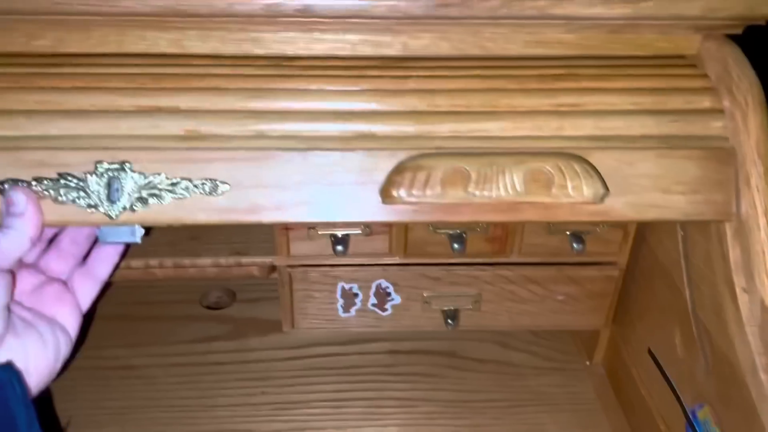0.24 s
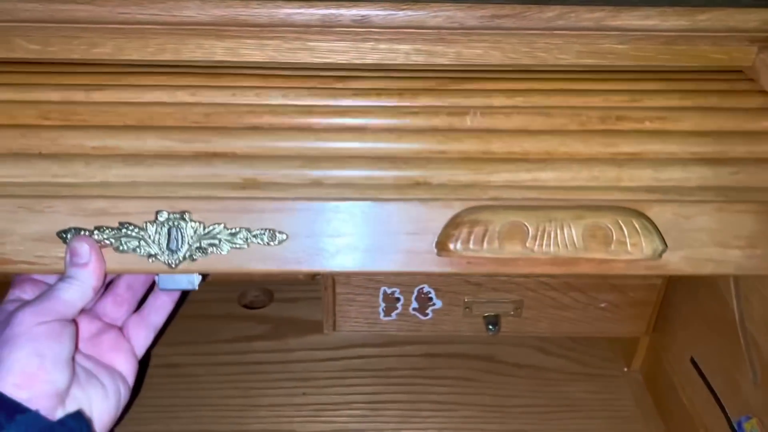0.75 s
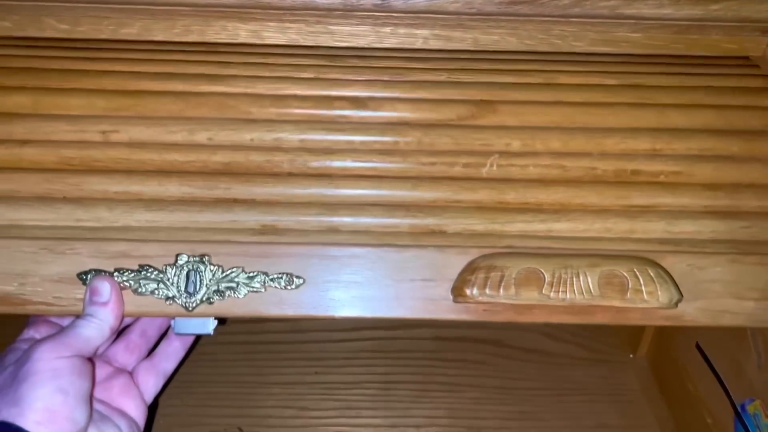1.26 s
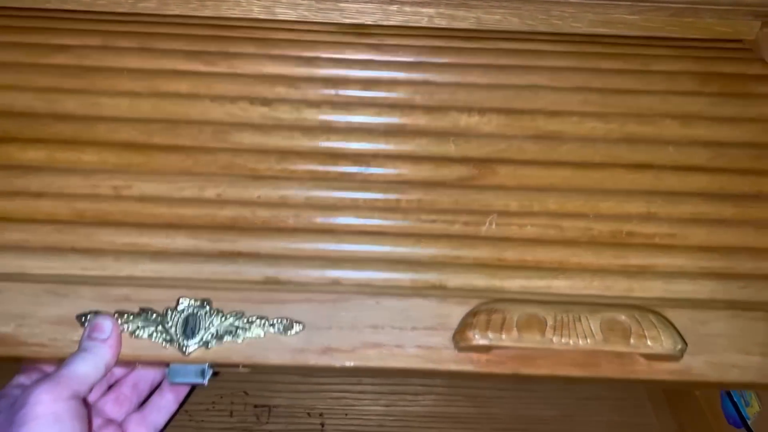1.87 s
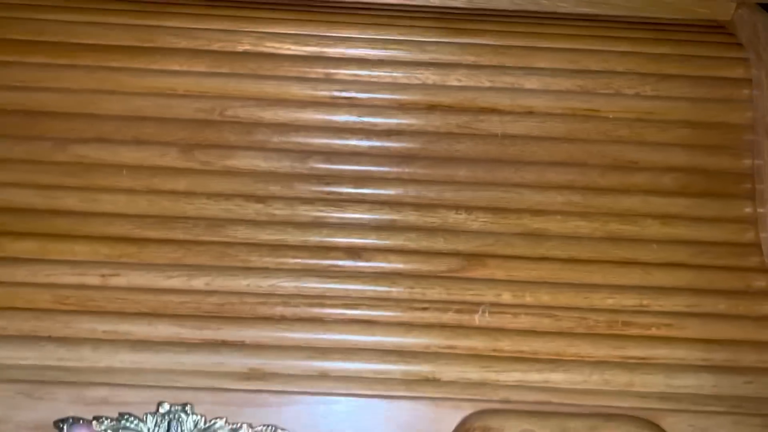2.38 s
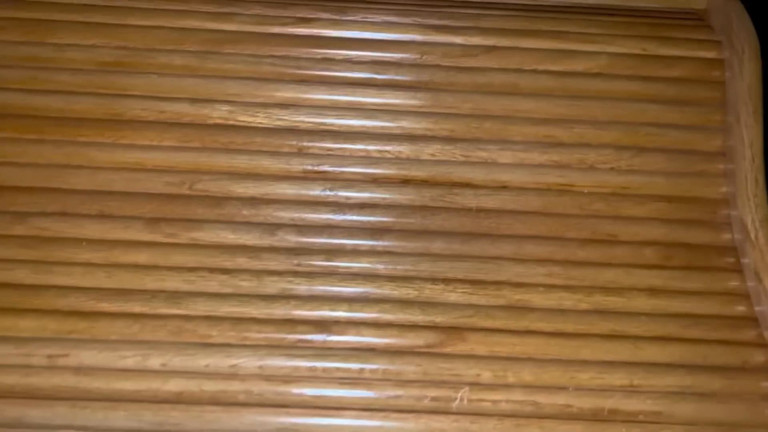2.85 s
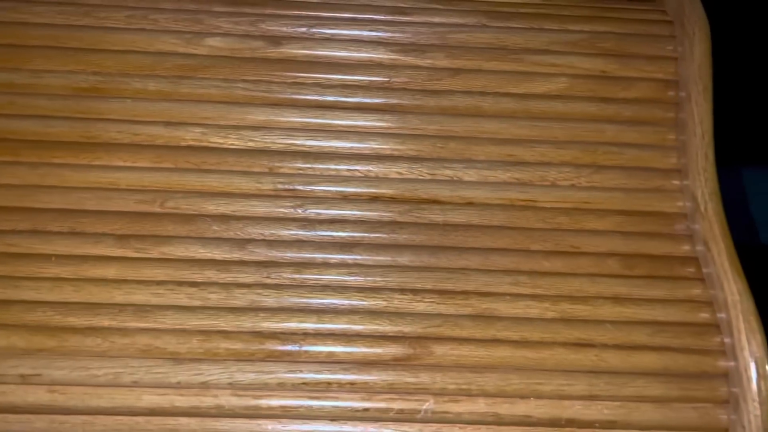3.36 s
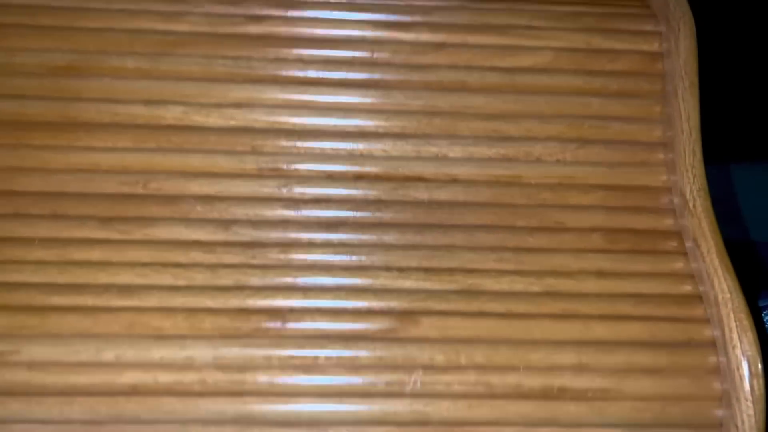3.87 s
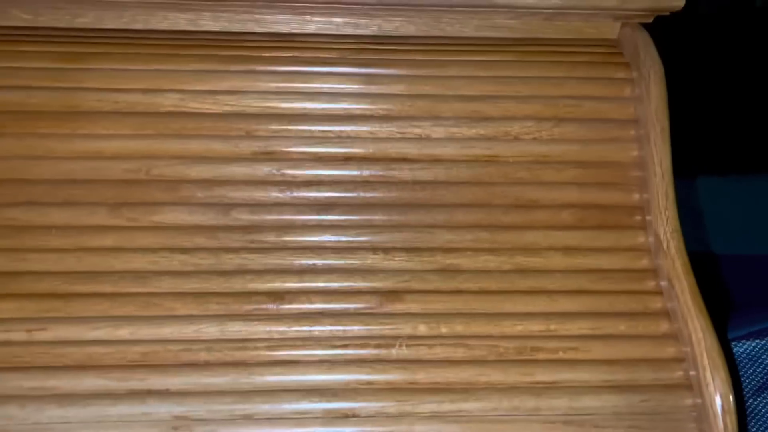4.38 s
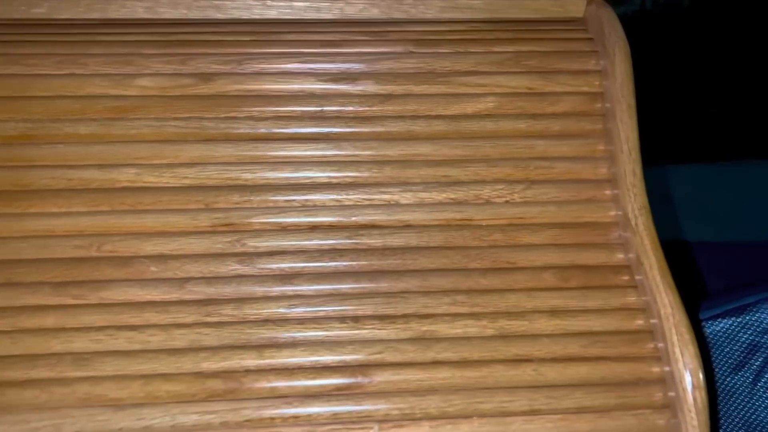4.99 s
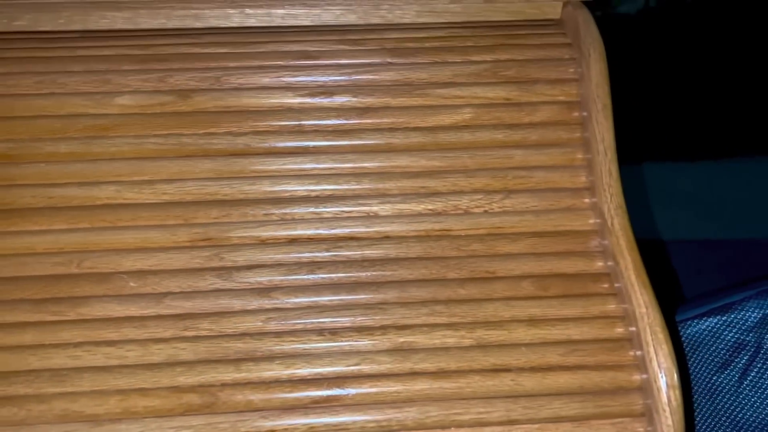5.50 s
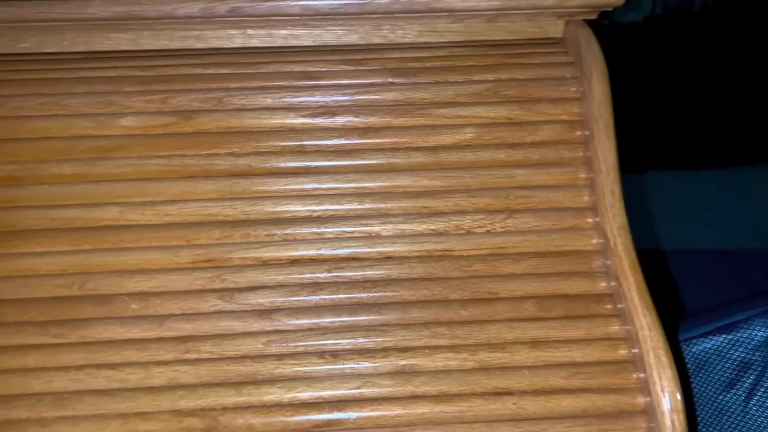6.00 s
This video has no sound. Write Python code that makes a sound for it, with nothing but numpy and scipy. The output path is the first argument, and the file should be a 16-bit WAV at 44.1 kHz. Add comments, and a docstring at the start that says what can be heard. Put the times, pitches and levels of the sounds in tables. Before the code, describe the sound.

A wooden slatted roll top is pulled down, heard close in a small room with a short tail and a faint low hush. It starts at once with a rumbling, rattling push and a clack at 0.1 seconds, then eases, with soft thumps and a slight creak around 0.3 to 0.4. From 0.7 the slide builds in uneven surges, strongest from about 1.0 to 2.7: slat ends scrape dryly over a low, sagging judder, with clacks near 1.05, 1.4, 1.6, 2.2 and 2.45. At 3.05 a hard, bright knock bursts out with a hollow thump, the loudest moment. A quiet gap follows, then another booming slide at 3.8 to 4.1 with low bumps and ticks. Weaker shuffles come at 4.5 to 4.8, small clacks at 5.1, and a softer settling bump with crisp clacks at 5.35. Very faint creaks and a light brush finish near 6.

```python
"""In a small room, close to the microphone, a wooden desk's slatted roll top is pulled down in uneven pushes.
Slat ends scrape and rattle as coloured friction noise while a gliding judder note and low noise boom.
Clacks, ticks and one sharp knock are noise bursts ringing the slats; thumps ring the hollow desk.
After the knock the curtain slides on, settles with a softer bump and creaks faintly over a steady hush."""
import sys
import numpy as np
from scipy import signal
from scipy.fft import rfft, irfft, next_fast_len
from scipy.io import wavfile
from scipy.ndimage import uniform_filter1d, map_coordinates

SR = 44100
rng = np.random.default_rng(int(sys.argv[2]) if len(sys.argv) > 2 else 0)


def wav_out(sig):
    """Save sig, one row per channel (or a flat mono array), as 16-bit PCM at SR to the path in sys.argv[1]."""
    wavfile.write(sys.argv[1], SR, np.round(np.clip(np.atleast_2d(sig).T, -1, 1) * 32767).astype(np.int16))


N = 275239
TIME = np.arange(N) / SR
RING_TIME = TIME[:SR // 2]


def amp(db):
    """Decibels to amplitude."""
    return 10 ** (np.asarray(db) / 20)


def unit(x):
    """Scaled to rms 1."""
    return x / np.sqrt(np.mean(x ** 2) + 1e-20)


def along(points, hz):
    """Read a curve of (frequency, value) points on a log frequency axis."""
    point_hz, values = np.transpose(points)
    return np.interp(np.log(hz + 1), np.log(point_hz + 1), values)


def curves(rows):
    """One value per sample for each column after the time."""
    s, *columns = np.transpose(rows)
    return [np.interp(TIME, s, column) for column in columns]


def wobble(knots_per_s):
    """A smooth random curve through evenly spaced random knots."""
    return map_coordinates(rng.standard_normal(4096), [TIME * knots_per_s], mode="wrap")


def filtered(x, response):
    """x times a response of frequency."""
    n = x.shape[-1]
    padded = next_fast_len(n + 8192)
    spectrum = rfft(x, padded) * response(np.fft.rfftfreq(padded, 1 / SR))
    return irfft(spectrum, padded)[..., :n]


def causal(x, gain_db, size=2048):
    """x through a minimum-phase filter with the given dB curve."""
    log_gain = gain_db(np.fft.rfftfreq(size, 1 / SR)) * np.log(10) / 20
    cepstrum = irfft(log_gain)
    # folding the cepstrum forward leaves nothing sounding before the onset
    cepstrum[1:size // 2] *= 2
    cepstrum[size // 2 + 1:] = 0
    impulse = irfft(np.exp(rfft(cepstrum)))
    return signal.fftconvolve(x, impulse[None], axes=1)[:, :x.shape[1]]


def add(track, s, sound):
    """Mix a sound in at time s."""
    part = track[:, round(s * SR):][:, :sound.shape[-1]]
    part += sound[..., :part.shape[1]]


# likeness of left and right: pitch_hz, correlation (1 = identical)
LIKENESS = [(100, 0.98), (300, 0.94), (640, 0.69), (1000, 0.41), (1700, 0.21), (2500, 0.52), (3600, 0.15),
            (5500, .2), (7200, 0.55), (9000, 0.067), (13000, 0.31)]


def stereo(pair, gain):
    """Two unrelated signals, coloured and blended into left and right, rms 1."""
    def mid_side_gain(hz):
        turn = np.arccos(np.clip(along(LIKENESS, hz), -1, 1)) / 2
        return gain(hz) * np.array([np.cos(turn), np.sin(turn)])

    mid, side = filtered(pair, mid_side_gain)
    return unit(np.array([mid + side, mid - side]))


def tail(decays):
    """A stereo noise tail, left energy 1, in which each frequency dies at its own speed."""
    noise = stereo(rng.standard_normal((2, SR // 2)), np.ones_like)
    hz, t, z = signal.stft(noise, SR, nperseg=128)
    fade = amp(-60 * t / along(decays, hz)[:, None])
    x = signal.istft(z * fade, SR, nperseg=128)[1][:, :SR // 2]
    return x / np.linalg.norm(x[0])


# hand pushes: start_s (full speed), rise_s, hold_s, release_s, scrape_db, rattle_db, boom_db,
# note_hz (judder, before it sags); levels are before the layer trims in slide()
HAND_PUSHES = [(0.029, 0.13, .025, 0.18, -49.5, -41.5, -27.5, 135),
               (0.104, 0.087, .015, 0.14, -51.5, -41.5, -29, 157.9),
               (0.338, 0.22, .06, 0.11, -59, -51, -38, 172),
               (0.675, 0.21, .04, 0.1, -53.5, -49.5, -34.5, 148),
               (0.753, 0.24, 0.056, 0.35, -53, -45.5, -40.5, 150),
               (1.03, .12, .025, 0.087, -51, -40, -23.5, 154.8),
               (1.244, 0.16, 0.094, 0.14, -51, -41.5, -30.5, 150.9),
               (1.54, .19, .11, 0.29, -53.5, -45.5, -34, 150),
               (1.796, 0.098, 0.087, 0.18, -48, -38.5, -25, 150),
               (1.93, 0.077, 0.017, 0.32, -51.5, -39, -23, 133.8),
               (2.106, 0.24, 0.086, .09, -47, -39.5, -26.5, 139.6),
               (2.186, .05, 0.013, .14, -49, -39, -23.5, 133.7),
               (2.424, .12, 0.018, 0.13, -53.5, -45, -30.5, 155.3),
               (2.511, .12, .06, 0.13, -52.5, -46, -37, 148), (2.627, .12, 0.036, .16, -49, -40, -28, 139),
               (2.965, .27, 0.1, 0.11, -50, -42, -31.5, 148),
               (3.494, 0.97, .12, .30, -68, -61, -59.5, 139.9),
               (3.799, .14, .07, .15, -50, -42.5, -31, 140), (3.88, 0.082, .07, 0.26, -49, -37, -24, 114.8),
               (4.057, 0.082, 0.027, 0.22, -57.5, -52, -29, 142),
               (4.488, 0.14, 0.077, .15, -55.5, -49.5, -34, 138),
               (4.60, .10, .08, 0.15, -52.5, -44.5, -34.5, 142),
               (4.83, .25, .27, 0.79, -65, -60, -49, 155.5),
               (5.498, 0.07, .15, .40, -106.5, -66.5, -53.5, 140.8),
               (6.212, 0.49, .04, 0.18, -59, -53, -56, 140)]


def pushes():
    """Levels of boom, rattle and scrape (dB) and the judder note (Hz): each push rises, holds and dies away."""
    columns = np.transpose(HAND_PUSHES)[:, :, None]
    start, rise, hold, release, scrape_db, rattle_db, boom_db, note_hz = columns
    edge_db = 20  # scrape growth over the rise, and its fall over the release
    # the heavy curtain starts and stops booming a little after the slats move, and swells and fades faster;
    # the rattle falls between the scrape and the boom
    boom_lag_s, boom_steepness = .033, 1.288
    rattle_lag_s, rattle_steepness = 0.0086, 1.076
    sag_hz_per_s, sag_s = 90, .2  # the note sinks as a push spends itself, for at most this long

    def fade_db(t):
        before, after = (start - t) / rise, (t - start - hold) / release
        return edge_db * np.clip(np.maximum(before, after), 0, 10)

    t = TIME[::64]
    scrapes = amp(scrape_db - fade_db(t)) ** 2
    rattles = amp(rattle_db - rattle_steepness * fade_db(t - rattle_lag_s)) ** 2
    booms = amp(boom_db - boom_steepness * fade_db(t - boom_lag_s)) ** 2
    levels = [10 * np.log10(power.sum(axis=0)) for power in (booms, rattles, scrapes)]
    # pushes share the note by boom power, so the strongest leads
    notes = note_hz - sag_hz_per_s * np.clip(t - start, 0, sag_s)
    note = np.sum(booms * notes, axis=0) / booms.sum(axis=0)
    return curves(np.transpose([t, *levels, note]))


def grains(hits_per_s, spread_db, smooth):
    """Tiny contacts of scattered size on a bed of smooth friction."""
    struck = rng.random((2, N)) < hits_per_s / SR
    sizes = rng.standard_normal((2, N)) * amp(spread_db * rng.standard_normal((2, N)))
    return unit(struck * sizes) + smooth * rng.standard_normal((2, N))


def patchy(pair, depth_db):
    """The resonances shift as each slat passes a new spot of the groove."""
    z = signal.stft(pair, nperseg=1024)[2]
    field = uniform_filter1d(rng.standard_normal(z.shape[1:]), size=4, axis=0)  # across frequency
    field = uniform_filter1d(field, size=10, axis=1)  # across time
    return signal.istft(z * amp(depth_db * unit(field)), nperseg=1024)[1][:, :N]


# ring of the slats, rubbed or struck: pitch_hz, level_db (relative, used only when struck)
SLAT_MODES = [(335, -4), (813, 0), (1394, -2), (1550, -6), (2187, 0), (2377, -3), (2562, 0), (2886, -5),
              (3223, -9), (3553, -8), (3801, -8), (3976, -5), (4760, -6), (5263, -4), (5810, -5),
              (6122, -3), (6336, -4), (6606, -6)]


def rubbed(spectrum, lift_db, width_hz):
    """Gain of rubbed wood: a broad spectrum, lifted at each slat mode."""
    def gain(hz):
        peaks = [1 / (1 + ((hz - mode_hz) / width_hz) ** 2) for mode_hz, _ in SLAT_MODES]
        return amp(along(spectrum, hz) + lift_db * np.max(peaks, axis=0))

    return gain


# colours of the slide, each: pitch_hz, level_db (per Hz, relative)
# low boom of the curtain over the desk
BOOM_COLOUR = [(30, -30), (55, -16), (105, 1.5), (135, -1), (170, 2), (210, -9.5), (260, -20), (330, -24.5),
               (700, -65)]
# deep rocking of the carcass
SWAY_COLOUR = [(20, -23.5), (45, -7.5), (85, -2), (125, -15), (300, -55.5)]
# loose slats rattling
RATTLE_COLOUR = [(120, -35.5), (200, -4), (254, 0), (291, -9), (336, -3), (641, -12), (789, -12),
                 (932, -15), (1220, -16), (1370, -24), (2400, -37), (3120, -42), (5280, -120)]
# slat ends scraping in the grooves
SCRAPE_COLOUR = [(820, -30), (1400, -6.5), (2010, -4), (2290, -4.5), (3390, -8), (3750, -8), (4360, -7),
                 (7510, -10.5), (8820, -13), (9190, -19.5), (10100, -40.5), (10800, -19), (11500, -14),
                 (14000, -18), (15500, -20.5)]


def slide():
    """Slat ends chatter along the grooves by stick-slip and set the curtain booming."""
    boom_db, rattle_db, scrape_db, note_hz = pushes()
    phase = 2 * np.pi * np.cumsum(note_hz * np.exp(.06 * wobble(55))) / SR
    octave = amp(-23.5 + 6 * wobble(20)) * np.sin(2 * phase)
    judder = unit((np.sin(phase) + octave) * amp(3.9 * wobble(35)))
    rumble = stereo(rng.standard_normal((2, N)), lambda hz: amp(along(BOOM_COLOUR, hz)))
    # the harder the push, the more the stick-slip locks on to one note; a very light one does not start it
    locked = .75 / (1 + np.exp(-(boom_db + 35) / 4))
    started = 1 / (1 + np.exp(-(boom_db + 60) / 3))
    blend = np.sqrt(locked) * judder + np.sqrt(1 - locked) * rumble
    boom = started * amp(boom_db + 0.43) * blend

    # even a light touch rocks the carcass, deep below the judder
    rocking = stereo(rng.standard_normal((2, N)), lambda hz: amp(along(SWAY_COLOUR, hz)))
    sway = amp(-45.5 + 0.23 * (boom_db + 35.0)) * rocking

    # friction swells with every judder and with the uneven grain of the wood
    grip = unit(amp(1.23 * wobble(70) + 0.37 * locked * np.sin(phase)))
    rattle_grains = patchy(grains(hits_per_s=900, spread_db=1.5, smooth=1.0), depth_db=3.0)
    rattle = stereo(rattle_grains, rubbed(RATTLE_COLOUR, lift_db=3.5, width_hz=10.0))
    scrape_grains = patchy(grains(hits_per_s=1700, spread_db=3.0, smooth=1.727), depth_db=3.0)
    scrape = stereo(scrape_grains, rubbed(SCRAPE_COLOUR, lift_db=3.5, width_hz=44))
    friction = grip * amp(rattle_db + 3.0) * rattle + grip ** 0.25 * amp(scrape_db + 2.5) * scrape
    return boom + sway + friction


def hardened(spectrum, treble_db):
    """A dB curve whose treble rises with the hardness of the contact."""
    return lambda hz: along(spectrum, hz) + treble_db * hz ** 4 / (hz ** 4 + 3500 ** 4)


# decay of the struck wood: pitch_hz, t60_s
WOOD_DECAY = [(300, .16), (1000, .12), (3000, .085), (6000, .07), (12000, .03)]


def blow(colour_db, contact_s, ring_db, wood_db, lag_s):
    """One contact: snap, brief crunch, slat modes and dense wood ring; its loudest millisecond has rms 1."""
    t = RING_TIME
    hz, db = np.transpose(SLAT_MODES)[:, :, None]
    strength = amp(db + 2 * rng.standard_normal(hz.shape)) * rng.choice([-1, 1], hz.shape)
    decay = amp(-60 * t / along(WOOD_DECAY, hz))
    ring = np.sum(strength * decay * np.sin(2 * np.pi * hz * t), axis=0)
    crunch = rng.standard_normal(len(t)) * np.exp(-t / contact_s)
    snap = .5 * (t == 0)
    direct = snap + crunch / np.linalg.norm(crunch) + amp(ring_db) * ring / np.linalg.norm(ring)
    # the sound reaches the two microphone ports at different moments
    port_lags_s = np.array([[0], [lag_s]])
    pair = filtered(direct, lambda f: np.exp(-2j * np.pi * f * port_lags_s))
    x = causal(pair + amp(wood_db) * tail(WOOD_DECAY), colour_db)
    power = uniform_filter1d(np.mean(x ** 2, axis=0), size=44, mode="constant")  # 1 ms average
    return x / np.sqrt(power.max())


# slats clacking in the grooves: start_s, level_db (before trim), treble_db
SLAT_CLACKS = [(0.1215, -26, -8), (0.611, -34.5, -19), (1.051, -34, -49), (1.414, -33, -12),
               (1.581, -35, -17), (2.168, -25, -15), (2.223, -28, -2), (2.454, -26.5, -14), (2.797, -38, 2),
               (3.778, -35, -4), (4.563, -35, -23), (4.570, -29.5, -35), (5.132, -39.5, 9),
               (5.137, -38.5, -27), (5.3424, -38, -5), (5.3452, -30.5, 2.5), (5.351, -35, -1)]
# small hard ticks of the slat edges: start_s, level_db, pitch_hz
EDGE_TICKS = [(2.198, -38, 5468), (2.785, -37, 12300), (2.797, -36, 4560), (2.968, -43, 6050),
              (3.9511, -39, 4500), (4.045, -43, 4340), (4.313, -58, 4209), (4.709, -46, 4610)]
# colour of a slat dropping against the groove wall: pitch_hz, level_db (relative)
CLACK_COLOUR = [(30, -22), (150, -1.5), (350, 4.5), (900, -1.5), (1600, -7), (2500, -3), (3800, -12.5),
                (6000, -13), (14000, -21)]


def clacks():
    """Loose slats drop against the groove walls; their edges tick."""
    out = np.zeros((2, N))
    for s, db, treble_db in SLAT_CLACKS:
        colour_db = hardened(CLACK_COLOUR, treble_db)
        clack = blow(colour_db, contact_s=0.0017, ring_db=-16, wood_db=-3.5, lag_s=.00005)
        add(out, s, amp(db - 2.5) * clack)
    for s, db, pitch_hz in EDGE_TICKS:
        edge_db = lambda hz: -10 * np.log10(1 + ((hz - pitch_hz) / 1300) ** 2)
        tick = blow(edge_db, contact_s=0.0011, ring_db=-3.5, wood_db=-5.5, lag_s=.00002)
        add(out, s, amp(db) * tick)
    return out


# contacts of the sharp knock: start_s, level_db (before trim), treble_db
KNOCK_CONTACTS = [(3.0552, -20, -5), (3.0568, -10.5, -2), (3.0604, -7, 5), (3.0616, -15, -1),
                  (3.0725, -24, -6), (3.086, -26, -6)]
# colour of the hard catch: pitch_hz, level_db (relative)
CRACK_COLOUR = [(30, -30), (150, -4), (260, 2), (450, -1), (900, -1), (1500, -1), (2400, 0), (3300, -4),
                (4400, -3.5), (5400, 0), (6300, 5), (7500, -6), (13000, -17), (16000, -32)]


def knock():
    """The curtain catches hard on one side, in a quick burst of contacts."""
    out = np.zeros((2, N))
    for s, db, treble_db in KNOCK_CONTACTS:
        colour_db = hardened(CRACK_COLOUR, treble_db)
        contact = blow(colour_db, contact_s=.0009, ring_db=-11, wood_db=-8, lag_s=.00034)
        add(out, s, amp(db - 3.5) * contact)
    return out


# weight of the curtain landing on the desk: start_s, level_db (before trim)
LANDINGS = [(.29, -32), (.435, -35), (1.052, -29), (2.228, -26), (3.053, -17), (3.083, -22), (3.879, -24),
            (3.965, -24), (5.133, -32), (5.344, -27), (5.364, -28), (5.405, -34)]
# ring of the hollow desk: pitch_hz, level_db (relative), t60_s
DESK_MODES = [(48.94, -3.5, 0.31), (65, 4, 0.29), (99.7, -3, 0.37), (125.4, 3, 0.41), (165, -5.5, 0.18),
              (238.2, 2.5, 0.0797), (242.6, 4, 0.035), (327.6, -8.5, 0.069), (474, -12, 0.17)]


def thumps():
    """The desk carcass rings low, as decaying modes, under the weight of the curtain."""
    out, t = np.zeros((2, N)), RING_TIME
    hz, db, t60 = np.transpose(DESK_MODES)[:, :, None]
    soft_onset = 1 - np.exp(-t / 0.006)
    for s, level_db in LANDINGS:
        strength = amp(db + 0.37 * rng.standard_normal(hz.shape) - 60 * t / t60)
        modes = strength * np.sin(2 * np.pi * (hz * t + rng.random(hz.shape)))
        add(out, s, amp(level_db - 7.5) * modes.sum(axis=0) * soft_onset)
    return out


# creaks of the wood: start_s, pitch_hz (midway), level_db
WOOD_CREAKS = [(0.3, 246, -42), (5.66, 574, -67.5), (5.83, 669, -69), (6.03, 571, -62)]


def creaks():
    """Brief, slightly rising squeaks of wood on wood."""
    out, t = np.zeros((2, N)), TIME[:SR // 10]
    for s, hz, db in WOOD_CREAKS:
        pitch = hz * (1 + 0.87 * (t - t.mean()) + 0.011 * wobble(140)[:len(t)])
        squeak = np.hanning(len(t)) * np.sin(2 * np.pi * np.cumsum(pitch) / SR)
        add(out, s, amp(db) * unit(squeak))
    return out


# decay of the small room: pitch_hz, t60_s
ROOM_DECAY = [(120, 0.233), (500, 0.22), (3000, 0.19), (12000, 0.21)]


def room(desk):
    """The room answers the desk with a short diffuse tail."""
    return amp(-19) * signal.fftconvolve(desk, tail(ROOM_DECAY), axes=1)[:, :N]


# colour of the background hush: pitch_hz, level_db (per Hz, relative)
HUSH_COLOUR = [(15, -34), (25, -9), (64, 3), (144, -12.5), (221, -3.5), (281, -15.5), (331, -8), (722, -31),
               (1240, -22), (3440, -40.5), (6730, -41), (8810, -58), (10100, -66.5), (12200, -47.5),
               (15500, -52)]


def hush():
    """Steady coloured noise behind everything."""
    return amp(-53.5) * stereo(rng.standard_normal((2, N)), lambda hz: amp(along(HUSH_COLOUR, hz)))


def scene():
    """The desk, the answer of the room and its steady hush."""
    desk = slide() + clacks() + knock() + thumps() + creaks()
    balance = amp([[.25], [-.25]])  # left a touch louder
    return (desk + room(desk)) * balance + hush()


def record(dry):
    """The microphone sheds the deepest bass, has a notch in the treble and rounds off the highest peaks."""
    notch_hz, width_hz, depth_db = 10050, 750, -26
    bass_hz, top_hz, ceiling = 28, 15500, .85
    coloured = causal(dry, lambda hz: depth_db * np.exp(-((hz - notch_hz) / width_hz) ** 2))
    rounded = coloured / (1 + (coloured / ceiling) ** 6) ** (1 / 6)
    return filtered(rounded, lambda hz: hz ** 4 / (hz ** 4 + bass_hz ** 4) / (1 + (hz / top_hz) ** 200))


dry = scene()
out = record(dry)
wav_out(out)
```